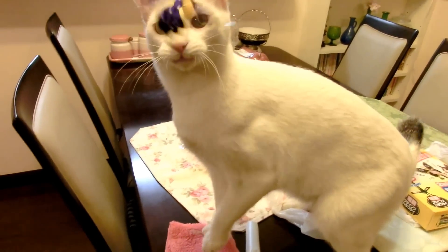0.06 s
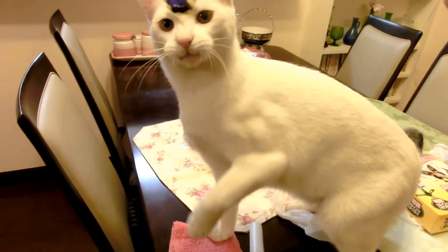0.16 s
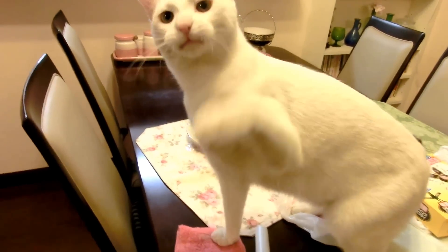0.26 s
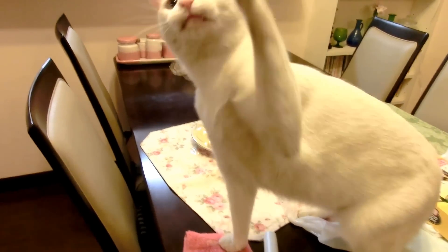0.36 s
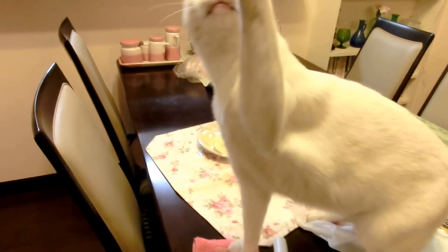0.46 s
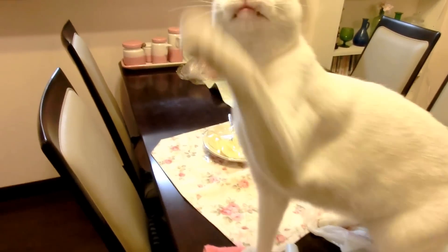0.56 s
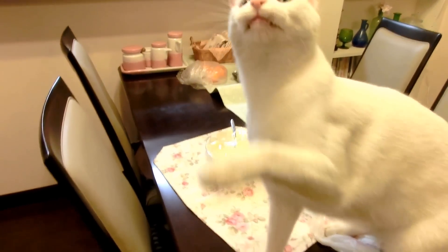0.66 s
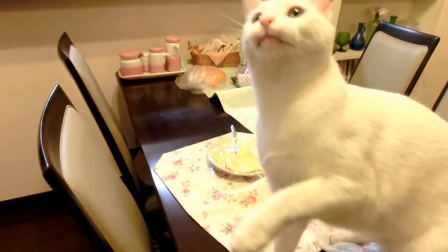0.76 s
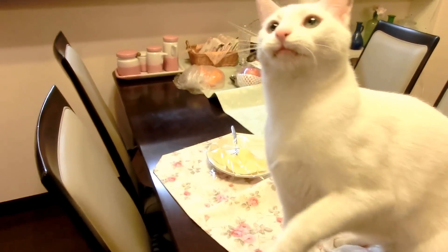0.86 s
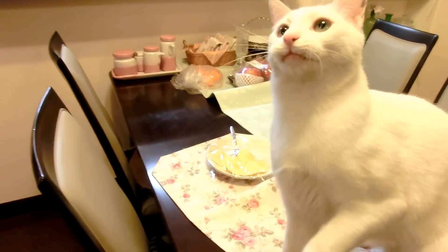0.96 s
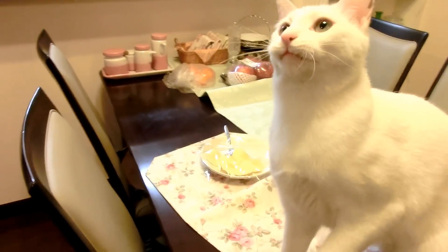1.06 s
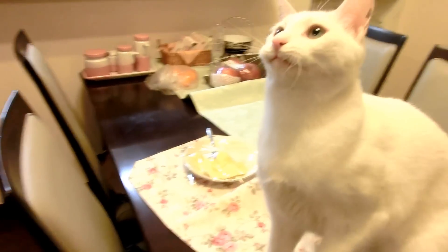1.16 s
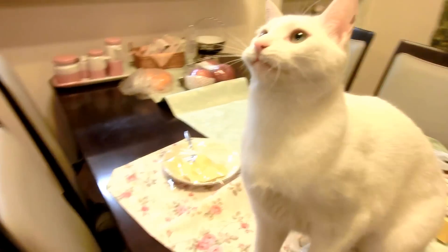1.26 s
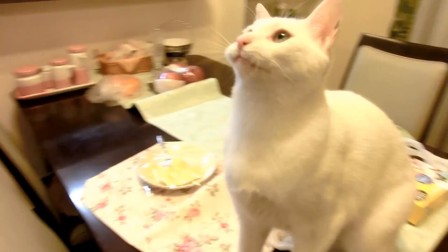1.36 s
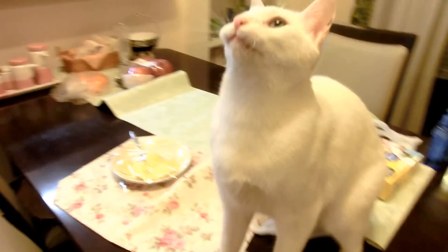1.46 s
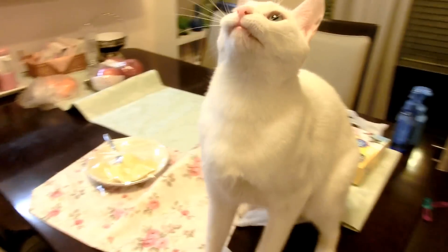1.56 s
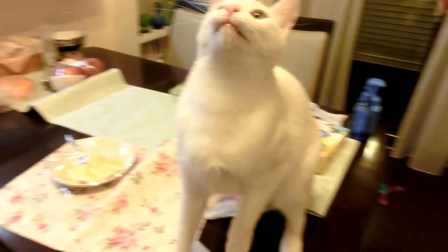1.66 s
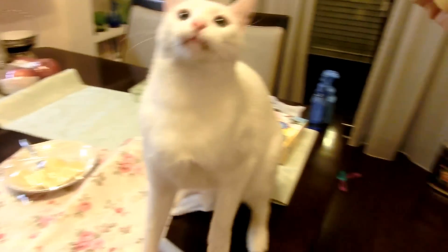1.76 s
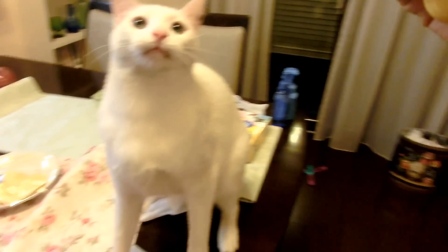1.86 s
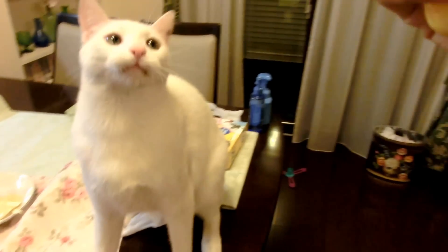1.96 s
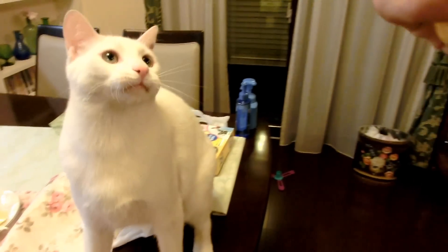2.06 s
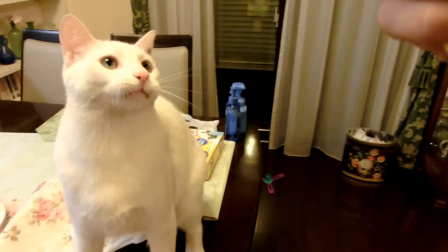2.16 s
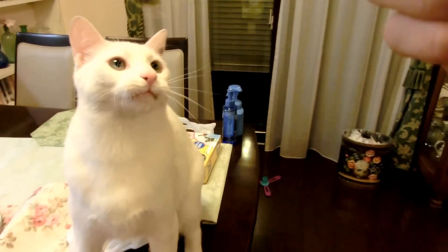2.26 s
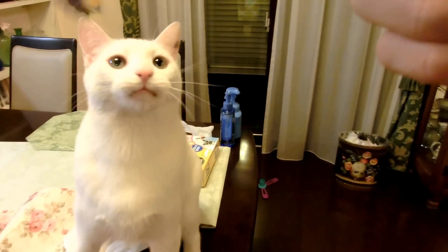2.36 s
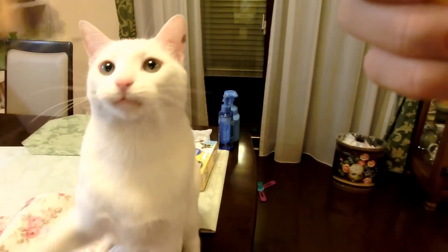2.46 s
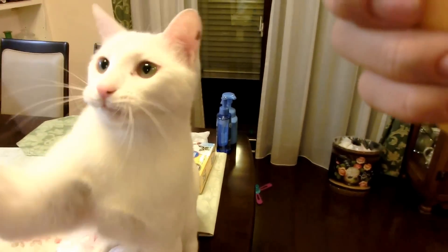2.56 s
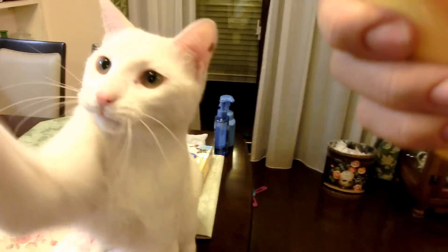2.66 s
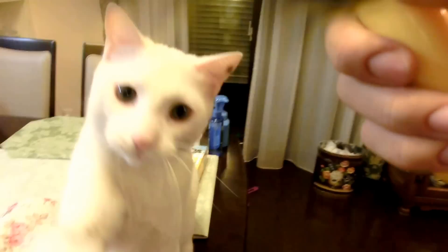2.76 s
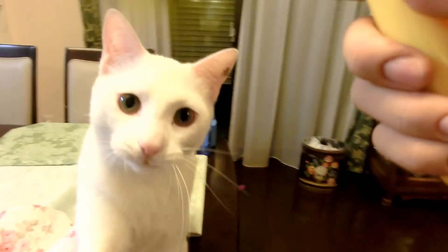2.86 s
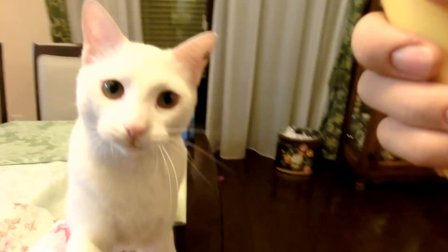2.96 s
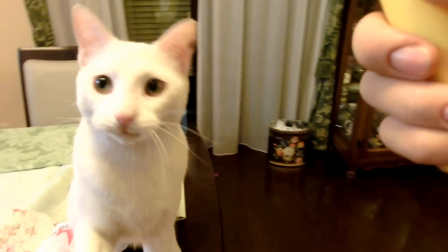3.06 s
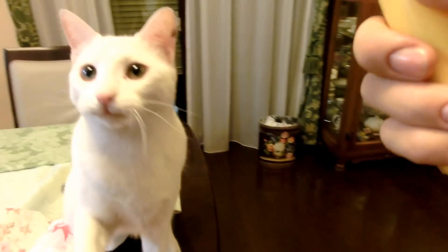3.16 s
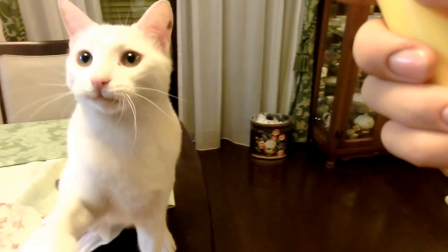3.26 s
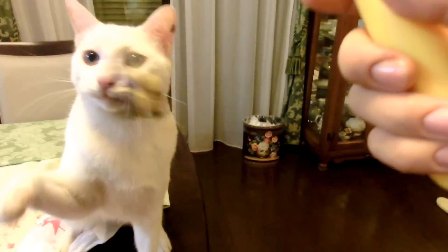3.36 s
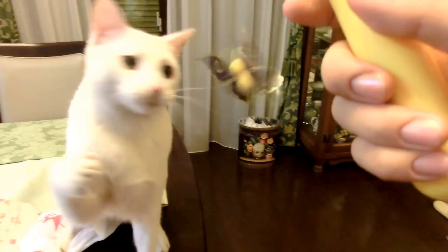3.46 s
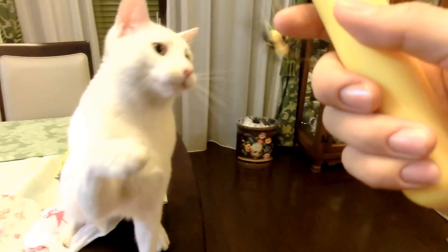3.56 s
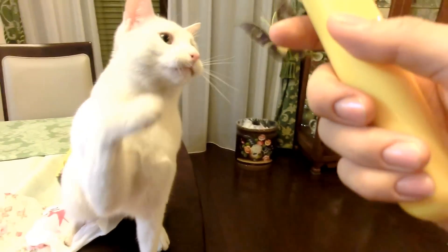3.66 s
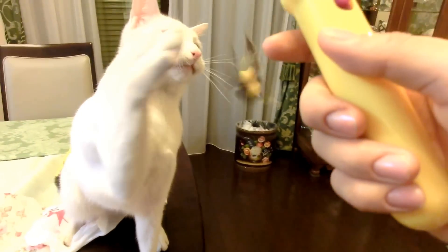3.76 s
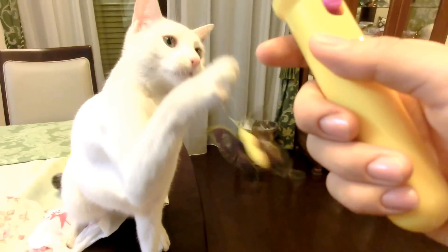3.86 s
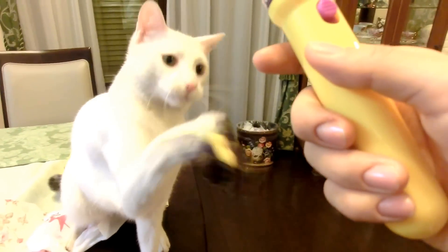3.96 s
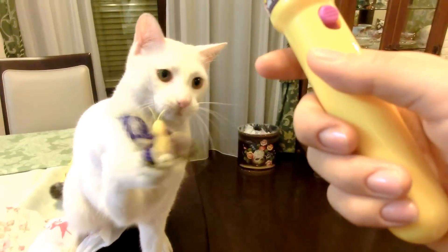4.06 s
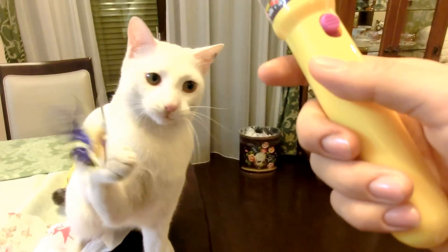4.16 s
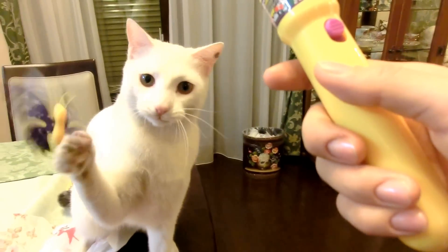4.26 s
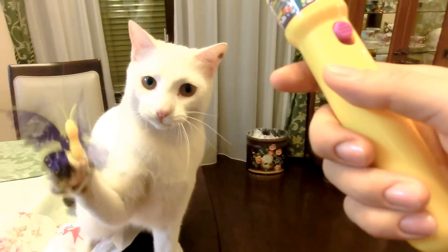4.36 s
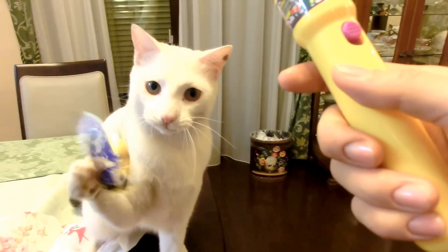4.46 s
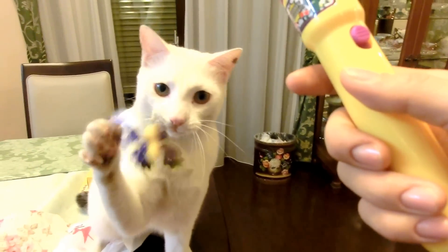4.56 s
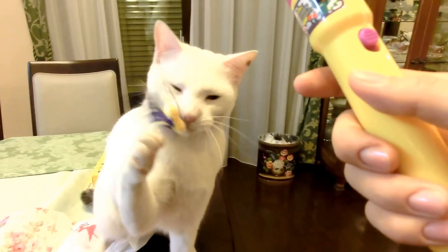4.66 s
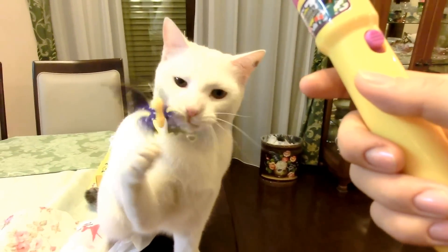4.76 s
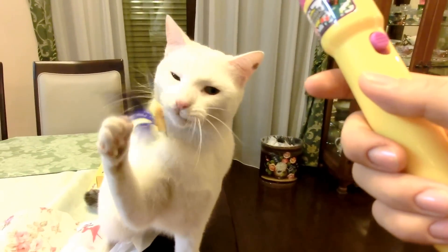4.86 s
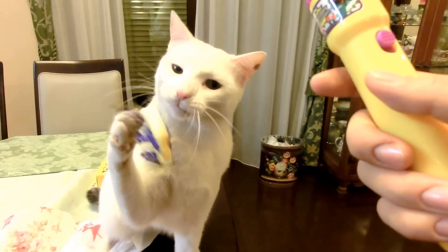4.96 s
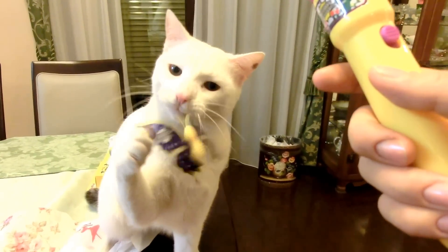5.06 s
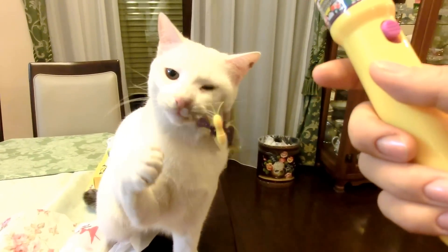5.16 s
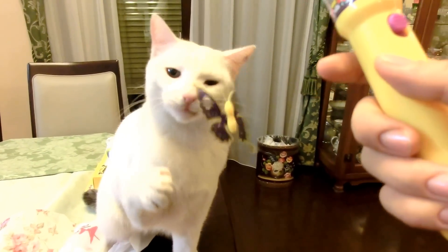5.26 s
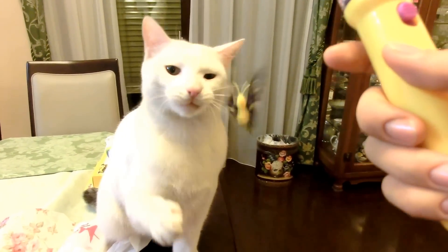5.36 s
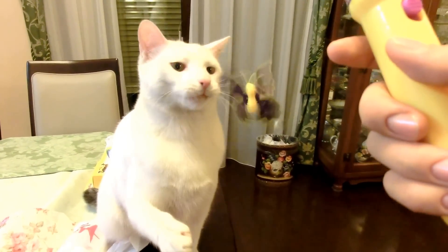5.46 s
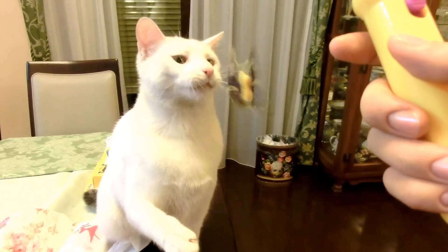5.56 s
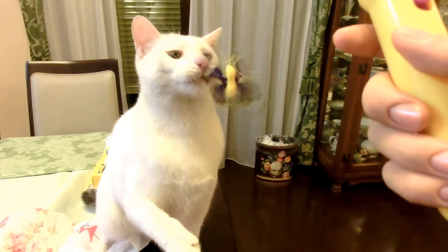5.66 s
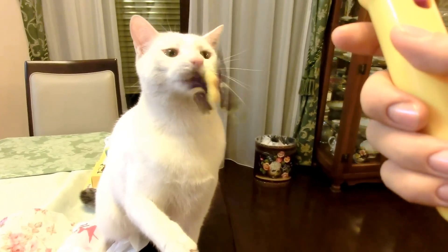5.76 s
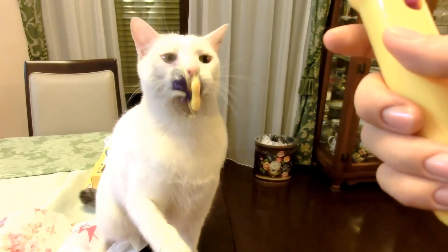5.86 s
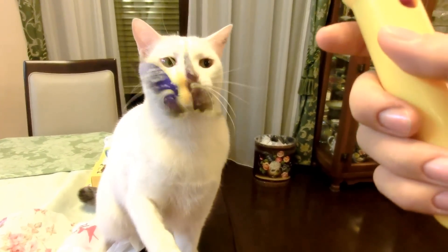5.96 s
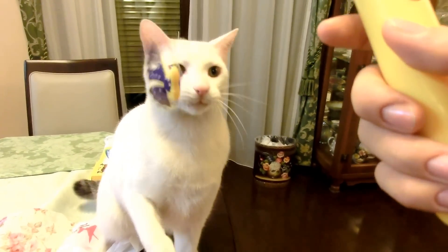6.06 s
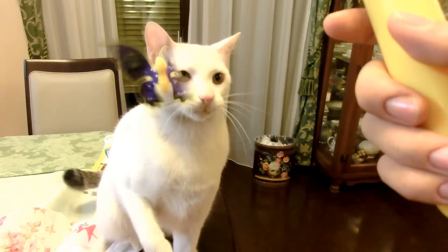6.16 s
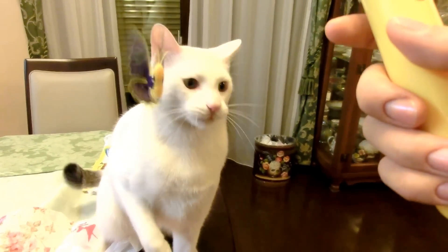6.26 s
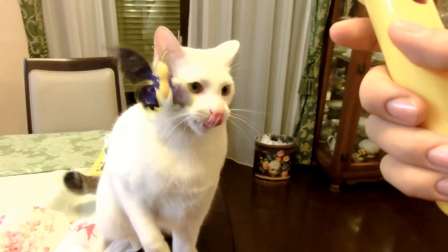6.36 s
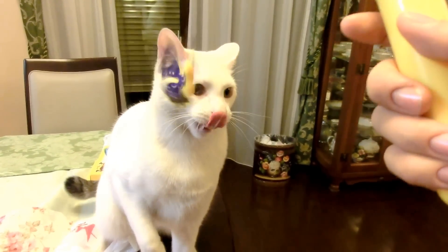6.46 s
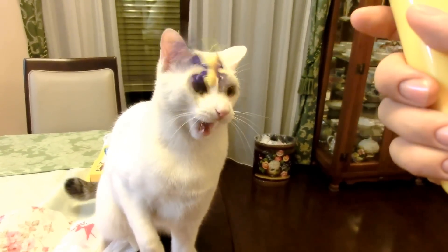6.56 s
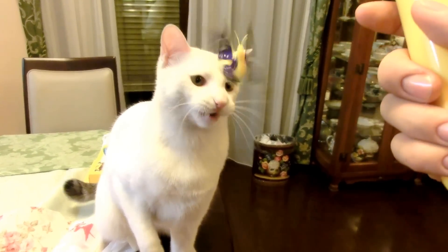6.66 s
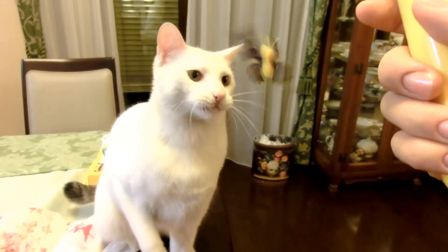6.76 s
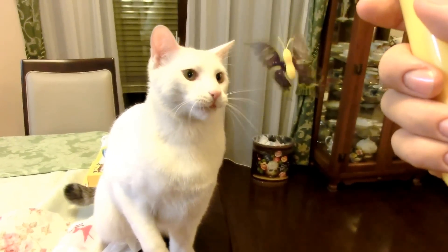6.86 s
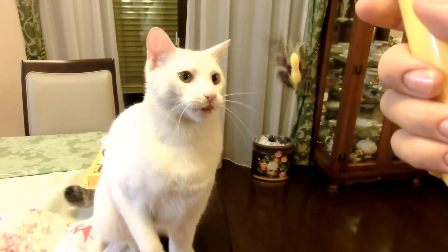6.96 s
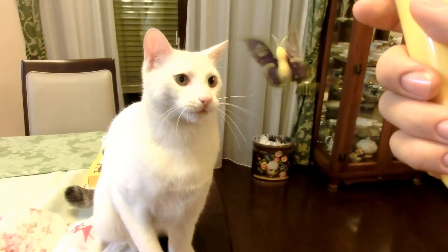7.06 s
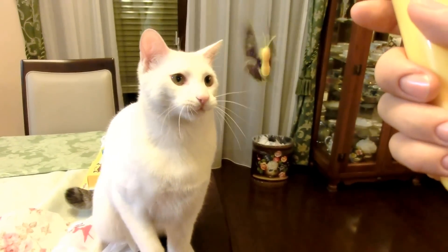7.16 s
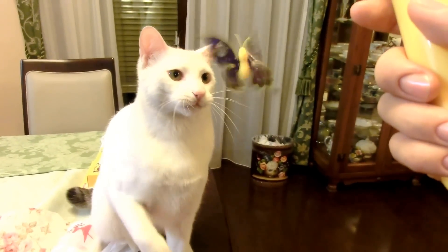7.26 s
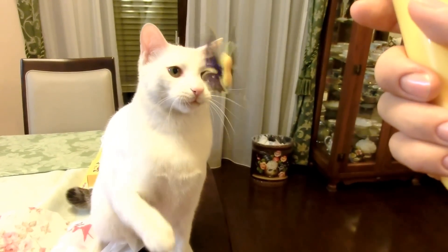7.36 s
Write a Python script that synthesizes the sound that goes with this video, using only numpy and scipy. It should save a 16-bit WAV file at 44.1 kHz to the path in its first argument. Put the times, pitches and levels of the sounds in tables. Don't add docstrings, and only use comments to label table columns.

```python
import sys
import numpy as np
from scipy import signal
from scipy.fft import rfft, irfft, next_fast_len
from scipy.io import wavfile

SR = 44100
rng = np.random.default_rng(int(sys.argv[2]) if len(sys.argv) > 2 else 0)


def generate_wav(signal):
    frames = np.transpose(np.atleast_2d(signal))
    scaled = np.clip(frames, -1, 1) * 32767
    pcm = np.round(scaled).astype(np.int16)
    wavfile.write(sys.argv[1], SR, pcm)


def magnitude_from_level(level_db):
    exponent = np.asarray(level_db, float) / 20
    return 10 ** exponent


N = 326781

# pitch_hz, level_db (per Hz)
AIR_COLOUR = [(22, 2.5), (70, -6.5), (200, -12), (311, -11.5), (650, -18), (900, -13), (1300, -20.5),
              (1800, -18)]
# pitch_hz, likeness (0-1)
LIKENESS = [(60, 0.75), (200, 0.72), (700, 0.78), (2400, 1), (4400, 1), (8000, 0.51), (15000, 0.18)]
# time_s, level_db
SCUFF_LEVEL = [
    (1.63, -66),
    (1.665, -44.5),
    (1.72, -39.5),
    (1.76, -47),
    (1.83, -53),
    (1.88, -80),
]
# pitch_hz, width_hz, level_db
TABLE_NOTES = [(173, 33, 2), (312, 9.1, 12.5), (526, 35, 1.5), (1070, 61, -27)]
# deepest_push_s, push_db, push_ms, turbulence_db
GUSTS = [(2.814, -25, 3.5, -21.5), (2.829, -27, 2.4, -22), (2.845, -18, 3.2, -22.5),
         (2.873, -9.5, 2.2, -22.5), (2.893, -15, 7.1, -24), (2.919, -19, 0.83, -34),
         (2.924, -26, 4.06, -21.5), (2.955, -28, 2.2, -23.5), (2.985, -43, 1.9, -32.5),
         (3.006, -31, 2, -28), (3.025, -21, 7.6, -33), (3.045, -19.5, 1.6, -20), (3.061, -29, 0.7, -34)]
# pitch_hz, level_db (per Hz)
GUST_COLOUR = [(25, -14), (65, -3), (250, -12.5), (600, -19.5), (1900, -22.5), (2400, -46)]
# time_s, peak_db
WIRE_TICKS = [(0.369, -56), (0.528, -38), (0.564, -41), (2.418, -48), (2.495, -37), (2.534, -43),
              (2.574, -40.5), (2.691, -39.5), (3.511, -45), (3.784, -42), (4.223, -40), (4.301, -40.5),
              (4.492, -38), (4.608, -48), (4.689, -43), (4.971, -35.5), (5.037, -40), (5.117, -40),
              (5.199, -40.5), (5.281, -46), (5.398, -39.5), (5.505, -36), (5.778, -44), (5.818, -40),
              (6.759, -42)]
# pitch_hz, width_hz, level_db, frame_share (0-1)
WING_NOTES = [(2325, 540, -1.5, 1), (3370, 670, -3.5, 0.82), (4024, 640, -6.5, 1), (4620, 356, -3.5, 0.91),
              (5580, 1500, -2.5, 0.79), (6360, 2100, -5, 0.79), (7690, 990, -1, 0.64),
              (9070, 1490, -5, 0.01), (11080, 1410, -4, 0), (12630, 200, -5, 0.15), (12900, 780, -11, 1)]
# time_s, snap_lag_ms (behind an even beat), swing_shift_ms (by the swinging wire)
MOTOR_LOAD = [(0.036, 35.7, 0.7), (0.546, 36.6, 1.1), (0.824, 39.9, 2.5), (1.06, 41.6, 2.7),
              (2.713, 48.8, 1.9), (3.146, 50.6, 0.8), (3.336, 44.0, 0.2), (3.533, 46.0, 0.1),
              (3.842, 40.9, 0.1), (4.079, 43.4, -0.1), (4.243, 50.3, -0.2), (4.361, 50.6, 0.2),
              (4.394, 44.7, 1.1), (4.825, 44.8, 0.8), (5.214, 41.2, 0.5), (5.525, 38.7, 0.7),
              (6.23, 39.1, 1.1), (7.406, 39.6, 1.0)]
# time_s, snap_peak_db, frame_db (against the film), rustle_db
FLIGHT = [(0, -22, -1.5, -43.5), (.3, -17, -16, -51.5), (.5, -28, 4, -43), (.68, -26, 4, -41),
          (.9, -20, -9, -46.5), (1.8, -21, -5.5, -46), (2.75, -20, -8.5, -47), (2.9, -14, -4, -37.5),
          (3.06, -35, 0, -60.5), (3.3, -16, -5.5, -42.5), (3.45, -24.5, -5.5, -51),
          (3.84, -21.5, -4.5, -45), (4.12, -32, -7, -50), (4.25, -21.5, -1, -47.5), (4.6, -23.5, -8, -47.5),
          (5.45, -24, -5.5, -48.5), (6.3, -18, -17, -48.5), (7.41, -22, -8.5, -47.5)]
# offset_ms (from the snap), level_db (against the snap), frame_added_db,
# swing_share (of the swing's shift), early_gain_db (at the early end of a 1 ms swing)
STROKE_CONTACTS = [
    (-16, -16, -12, 0.3, 5),
    (-5.3, -8.5, 9, 0.1, 0),
    (0, 0, -1, 1, 1.8),
    (12.5, -17, 20, 0.1, 0),
]
# start_s, length_s
WINGS_HELD = [
    (.56, .2),
    (.77, .03),
    (.89, .03),
    (1.555, .03),
    (2.77, .35),
    (3.86, .12),
    (4.1, .12),
    (4.61, .89),
]
# time_s, peak_db, frame_db (against the film)
PAW_SNAPS = [(0.5796, -14, -16), (0.621, -16, -5), (0.6483, -17, -5), (0.7044, -18, -13),
             (0.7409, -9.5, -11), (1.0996, -14.5, -10), (1.1361, -11, -10.5), (2.732, -15, -5),
             (2.794, -18, -22), (3.1001, -28, -6), (3.891, -17, 4), (3.908, -24.5, 1), (3.946, -19, -9),
             (3.9583, -24, 8), (4.1184, -32, 11), (4.628, -15.5, -18), (4.7098, -20, 1), (4.8265, -17, -8),
             (4.9052, -18, -7), (4.9507, -23.5, 1), (4.9787, -22.5, -7), (5.0953, -16.5, -30),
             (5.113, -25, -10), (5.1498, -25.5, 5), (5.1787, -28.5, 9), (5.2155, -20, -11),
             (5.2997, -30.5, 11), (5.4159, -21, -7), (5.45, -25.5, -13), (5.4863, -17.5, -16)]
# time_s, peak_db, frame_db (against the film)
JERK_SNAPS = [(.1142, -19, -29), (0.1549, -15.5, -16), (.507, -14, -6.5), (.8599, -15.5, -10),
              (0.9458, -20, -4.5), (1.0638, -19, -17), (1.255, -15, -16), (1.374, -16, -13),
              (1.53, -12.5, -15), (2.0056, -17.5, -14), (2.2002, -21, -5), (2.2027, -21, 14),
              (2.3188, -16.5, -13), (2.3226, -19, 11), (2.595, -20, 12), (2.599, -20, 13),
              (0.516, -27, -14), (0.5458, -18.5, -3), (3.2612, -13.5, -8.5), (3.185, -22.5, -8),
              (3.2215, -19.5, -3.5), (3.4944, -18, -6), (4.0406, -23.5, 4), (4.244, -19.5, -21),
              (4.509, -19.5, -6), (6.0724, -22, 9), (6.661, -24, 0), (6.7402, -18.5, -7), (6.7787, -20, -3)]
# time_s, peak_db, frame_db (against the film), crinkle_db (against the peak)
MIC_SLAPS = [(2.8153, -10, -5.5, -9), (2.824, -26, -11, -6), (2.838, -21, -9, -0.5),
             (2.8438, -10, -10, -9.5), (2.8647, -12, 6, -28), (2.8705, -4, -6, -31),
             (2.8745, 13.5, 14, -36.5), (2.8828, -22, -11, -16), (2.887, -29, 12, -21),
             (2.8938, -25, -7, -5), (2.8977, -26, 0, -13), (2.918, -16, 14, -15), (2.9237, -14.5, 2, -14.5),
             (2.9284, -24, 24, -10), (2.9338, -18, -7, -11), (2.9493, -23, -13, -4),
             (2.954, -21.5, 16, -5.5), (2.958, -10, 21, -16), (2.9831, -17, -3, -9.5),
             (2.988, -16.5, 8, -19), (2.9925, -24, -6, -6), (3.0051, -12, -4, -18), (3.014, -14, 7, -10.5),
             (3.024, -8, -8, -14.5), (3.0285, -23, -8, -18), (3.046, -16.5, -3, -8), (3.053, -20, -8, -11),
             (3.06, -13.5, -12, -11), (3.0627, -18, -1, -26), (3.0669, -30, 0, -3.5)]
# pitch_hz, width_hz, depth (0-1)
MIC_DIPS = [(1700, 410, 0.29), (12000, 320, 0.63)]

AIR_DB = -52


def rms_one(x):
    return x / np.sqrt(np.mean(x ** 2) + 1e-20)


def in_time(rows):
    s, db = np.transpose(rows)
    return magnitude_from_level(np.interp(np.arange(N) / SR, s, db, left=-200, right=-200))


def at_hz(points, hz):
    known_hz, value = np.array(points)[:, 0], np.array(points)[:, 1]
    return np.interp(np.log(hz), np.log(known_hz), value)


def drift(rate_hz):
    r = np.exp(-80 * np.pi * rate_hz / SR)
    noise = rng.standard_normal(N // 40 + 2002)
    slow = signal.lfilter([1], [1, -2 * r, r * r], noise)[2000:]
    return np.interp(np.arange(N) / 40, np.arange(len(slow)), rms_one(slow))


def clicks(times_s, db):
    out = np.full(N, 1e-18)
    out[(np.asarray(times_s) * SR).astype(int)] = magnitude_from_level(db)
    return out


def fade(x, ms):
    return signal.lfilter([1], [1, -np.exp(-1000 / SR / ms)], x)


def resonate(x, hz, width_hz):
    r = np.exp(-np.pi * width_hz / SR)
    ring = [1, -2 * r * np.cos(2 * np.pi * hz / SR), r * r]
    return signal.lfilter([(1 - r * r) / 2, 0, (r * r - 1) / 2], ring, x + 1e-18)


def no_bass(x):
    return signal.sosfilt(signal.butter(4, 1800, "high", fs=SR, output="sos"), x)


def to_stereo(pair, hz, apart=1.):
    alike = np.clip(at_hz(LIKENESS, hz), 0, 1) ** apart
    shared = np.sqrt(1 + alike) * pair[0]
    opposite = np.sqrt(1 - alike) * pair[1] * [[1], [-1]]
    return shared + opposite


def banded(source, spectrum, patchy_db, flicker_hz):
    out, together, size = 0, drift(flicker_hz), source.shape[-1]
    bottom, top = spectrum[0][0], spectrum[-1][0]
    edges = np.geomspace(bottom, top, round(2 * np.log2(top / bottom)) + 1)
    for k, (low, high) in enumerate(zip(edges, edges[1:])):
        band_filter = signal.butter(2, [low, high], "band", fs=SR, output="sos")
        band = signal.sosfilt(band_filter, source[k % 2])
        hz = np.sqrt(low * high)
        flicker = (together + 0.5 * drift(flicker_hz))[:size]
        gain = magnitude_from_level(at_hz(spectrum, hz) + patchy_db * flicker)
        out = out + gain * to_stereo(band, hz)
    return rms_one(out)


def room_air():
    noise = rng.standard_normal((2, 2, N))
    return magnitude_from_level(AIR_DB) * banded(noise, AIR_COLOUR, patchy_db=1.68, flicker_hz=20.4)


def room_echo(x):
    t60_s, wall_cut_hz = 0.12, 34000
    size = next_fast_len(N + SR)
    w = 2 * np.pi * np.arange(size // 2 + 1) / size
    dull = 1 / (1 + 1j * w * SR / (2 * np.pi * wall_cut_hz))
    echoes = np.zeros((2, len(w)), complex)
    for k, lag in enumerate(rng.uniform(.006, .03, 16) * SR):
        loop = magnitude_from_level(-60 * lag / SR / t60_s) * dull * np.exp(-1j * w * lag)
        echoes[k % 2] += (-1) ** (k // 2) * loop / (1 - loop)
    return irfft(rfft(x.mean(axis=0), size) * echoes, size)[:, :N]


def table_thud():
    soft_blow = signal.lfilter(np.hanning(SR // 250), 1, clicks([5.868], -23))
    return resonate(soft_blow, hz=180, width_hz=4.4)


def table_scuff():
    rub = rng.standard_normal((2, N)) * magnitude_from_level(1.0 * drift(40))
    board = sum(magnitude_from_level(db) * to_stereo(resonate(rub, hz, width), hz) for hz, width, db in TABLE_NOTES)
    broad = to_stereo(resonate(rub, 330, 850), 500)
    return in_time(SCUFF_LEVEL) * rms_one(rms_one(board) + magnitude_from_level(-3.0) * rms_one(broad))


def gusts():
    t = np.arange(int(.4 * SR)) / SR + 2.78
    s, push_db, ms, swirl_db = np.transpose(GUSTS)[:, :, None]
    push = -np.sum(magnitude_from_level(push_db) * np.exp(-((t - s) * 1000 / ms) ** 2), axis=0)
    push = signal.sosfilt(signal.butter(1, 35, "high", fs=SR, output="sos"), push)
    age_s = np.maximum(t - s + 0.0018, 0)
    swell_and_fade = np.exp(-age_s / 0.014) * (1 - np.exp(-age_s / 0.0015))
    swirl = np.sum(magnitude_from_level(swirl_db) * swell_and_fade, axis=0)
    air = banded(rng.standard_normal((2, 2, len(t))), GUST_COLOUR, patchy_db=1.0, flicker_hz=60)
    own_air = magnitude_from_level(-14) * air[::-1, ::-1] * [[1], [-1]]
    out, first = np.zeros((2, N)), int(t[0] * SR)
    out[:, first:first + len(t)] = push * magnitude_from_level([[1.5], [-2.5]]) + swirl * (air + own_air)
    return out


def crank():
    strokes_per_s = 25.52
    beat = np.arange(int(N / SR * strokes_per_s) - 1)
    even_s = beat / strokes_per_s
    s, lag_ms = np.transpose(MOTOR_LOAD)[:2]
    return beat, even_s + np.interp(even_s + .043, s, lag_ms) / 1000


def wire_ticks():
    s, db = np.transpose(WIRE_TICKS)
    faint = (rng.random(N) < 40 / SR) * magnitude_from_level(AIR_DB + 11.0 + 3.3 * rng.standard_normal(N))
    due = crank()[1] - 0.019
    faint += clicks(due, -41.5 + 2.5 * rng.standard_normal(len(due)))
    blows = signal.lfilter(np.hanning(SR // 1500), 1, clicks(s, db + 8) + faint)
    hollow = resonate(resonate(blows, 937, 275), 1356, 700)
    return magnitude_from_level(8.0) * (hollow + magnitude_from_level(-9) * resonate(blows, 2800, 400))


def rustle(per_s, size_db, grain_db, frame_db, tilt_db):
    born = np.flatnonzero(rng.random(N) < per_s * magnitude_from_level(4.0 * drift(20)) / SR)
    size_db = grain_db + size_db * np.minimum(rng.exponential(1, len(born)), 3.5)
    centre = rng.uniform(-0.29, len(WING_NOTES), len(born))
    white, together, out = rng.standard_normal((2, 2, N)), drift(68), 0
    for k, (hz, width, db, share) in enumerate(WING_NOTES):
        creases = fade(clicks(born / SR, size_db - 4.9 * (centre - k) ** 2), 1.0)
        bed = magnitude_from_level(2.0 * together + hz / 4500 * drift(26))
        gain = magnitude_from_level(db + share * frame_db + tilt_db * np.log2(hz / 5000))
        out = out + gain * to_stereo(resonate(white[k % 2] * (bed + creases), hz, 0.99 * width), hz)
    return in_time(np.array(FLIGHT)[:, [0, 3]]) * rms_one(no_bass(out))


def wing_strokes():
    strokes_per_swing, first_early_stroke = 3.4, .7
    slip_s = 2.85
    held_db = -8.5
    forced_tail_db, free_tail_db, lesser_tail_db = -11, -14, -20
    beat, snap = crank()
    load_s, _, swing_ms = np.transpose(MOTOR_LOAD)
    shift_ms = np.interp(snap, load_s, swing_ms)
    flight_s, peak, frame, _ = np.transpose(FLIGHT)
    snap_db, frame_db = np.interp(snap, flight_s, peak), np.interp(snap, flight_s, frame)
    swing = (beat - (snap > slip_s) - first_early_stroke) / strokes_per_swing
    early = np.cos(2 * np.pi * swing)
    free = np.all([(snap < start) | (snap > start + length) for start, length in WINGS_HELD], axis=0)
    forced = PAW_SNAPS + JERK_SNAPS
    unforced = np.abs(snap[:, None] - np.transpose(forced)[0]).min(axis=1) > .01
    rows = [(*row, forced_tail_db) for row in forced]
    for ms, db, added_db, share, early_db in STROKE_CONTACTS:
        chance = rng.standard_normal((3, len(beat)))
        s = snap + (ms - share * shift_ms * early + .4 * chance[0]) / 1000
        swing_db = early_db * early * np.sqrt(np.abs(shift_ms))
        peak_db = snap_db + np.where(free, 0, held_db) + db + swing_db + 1.32 * chance[1]
        contact_frame_db = frame_db + added_db - 1.5 * chance[2]
        tail_db = np.full(len(s), lesser_tail_db if ms else free_tail_db)
        contacts = np.transpose([s, peak_db, contact_frame_db, tail_db])
        rows += list(contacts[unforced | (abs(ms) > 2)])
    return np.transpose(sorted(map(tuple, rows)))


def wing_snaps(s, peak_db, frame_db, tail_db, crack_ms, swell_ms, tail_ms, spread_db, level_db, damping, apart):
    film_db = peak_db - 10 * np.log10(1 + magnitude_from_level(2 * frame_db))
    uneven_db = spread_db * rng.standard_normal((len(s), len(WING_NOTES)))
    first, last = int(s[0] * SR), min(int((s[-1] + .1) * SR), N)
    jitter, out = rng.choice([-1., 1.], (2, 2, last - first)), np.zeros((2, N))
    for k, (hz, width, db, share) in enumerate(WING_NOTES):
        blow_db = film_db + db + uneven_db[:, k] + level_db + share * frame_db
        blows = clicks(s, blow_db)[first:last]
        crinkles = clicks(s, blow_db + tail_db)[first:last]
        crack = fade(blows, crack_ms) - fade(blows, 0.39)
        shape = crack + fade(crinkles, tail_ms) - fade(crinkles, swell_ms)
        clean_click = magnitude_from_level(-0.5) * np.roll(blows, SR // 2000) * [[1], [(-1) ** (k // 2)]]
        drive = shape * jitter[k % 2] + clean_click
        ringing = resonate(drive, hz, damping * width)
        out[:, first:last] += (-1) ** k * to_stereo(ringing, hz, apart)
    return no_bass(out)


def scene():
    flight = wing_snaps(*wing_strokes(), crack_ms=0.73, swell_ms=2.86, tail_ms=4.48,
                        spread_db=2.5, level_db=11.0, damping=0.98, apart=0.59)
    slaps = wing_snaps(*np.transpose(MIC_SLAPS), crack_ms=0.43, swell_ms=0.19, tail_ms=2.7,
                       spread_db=2.5, level_db=11.5, damping=1.88, apart=2.8)
    toy = flight + wire_ticks() + rustle(per_s=700, size_db=3.0, grain_db=6, frame_db=-6.5, tilt_db=-4.0)
    near = toy + magnitude_from_level(-26) * room_echo(flight) + slaps + gusts()
    return near + room_air() + table_scuff() + table_thud()


def gain_control():
    duck_s, duck_db, attack_s, recover_db_per_s = 3.136, 11, 0.19, 5
    age_s = np.maximum(np.arange(N) / SR - duck_s, 0)
    left_db = np.maximum(duck_db - recover_db_per_s * age_s, 0)
    return magnitude_from_level(-left_db * (1 - np.exp(-age_s / attack_s)))


def roll_off(x):
    return signal.sosfilt(signal.butter(12, 16440, fs=SR, output="sos"), x)


def record(dry):
    x = dry * gain_control()
    for hz, width, depth in MIC_DIPS:
        x = x - np.clip(depth, 0, 1) * resonate(x, hz, width)
    x = signal.sosfilt(signal.butter(2, 15200, fs=SR, output="sos"), x)
    x = np.clip(x * magnitude_from_level([[.5], [-.5]]), -1, 1)
    x = signal.sosfilt(signal.cheby2(12, 70, 17000, fs=SR, output="sos"), x)
    return roll_off(x)


dry = scene()
out = record(dry)
generate_wav(out)
```